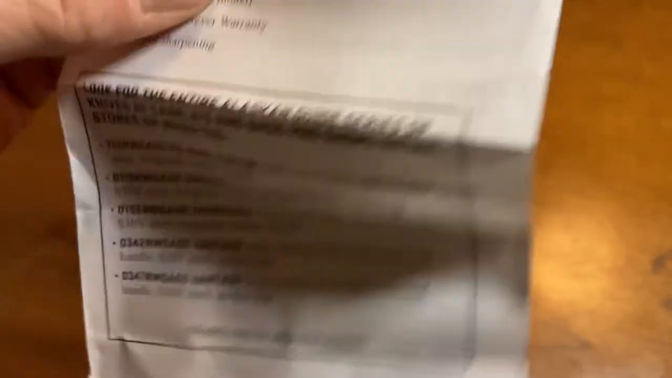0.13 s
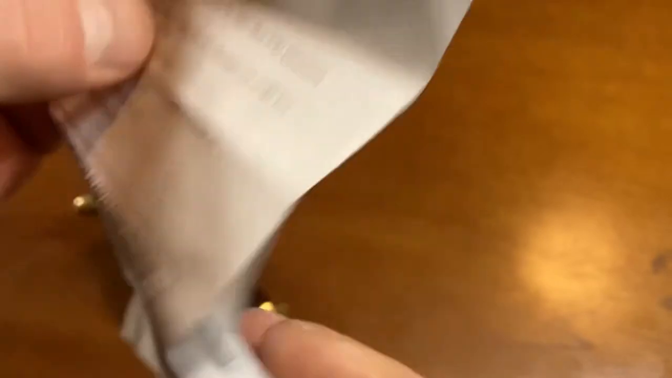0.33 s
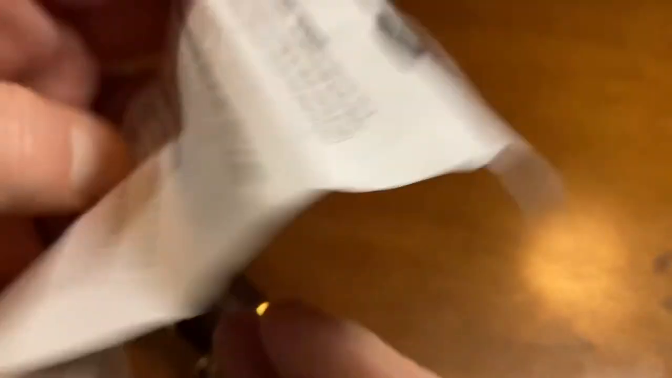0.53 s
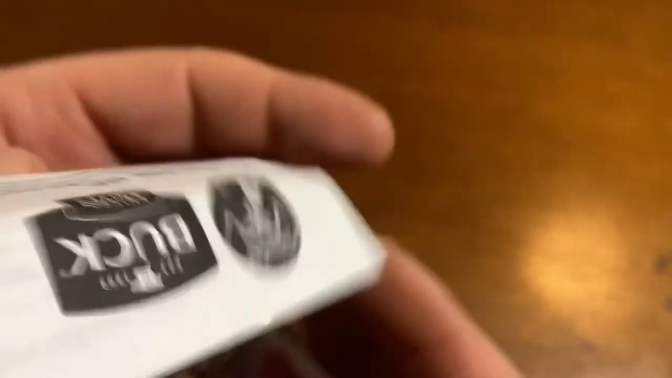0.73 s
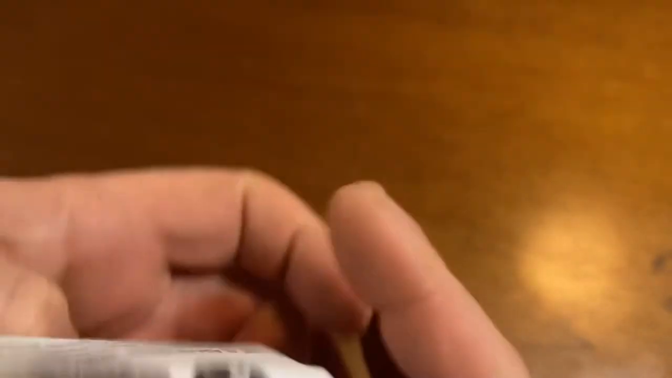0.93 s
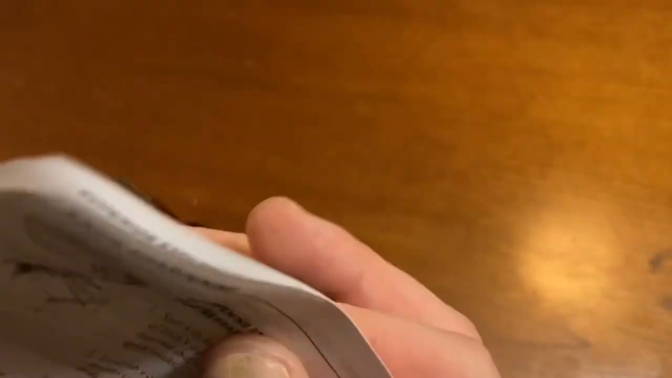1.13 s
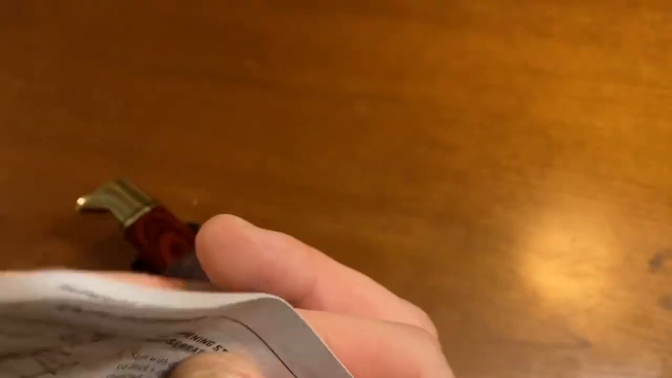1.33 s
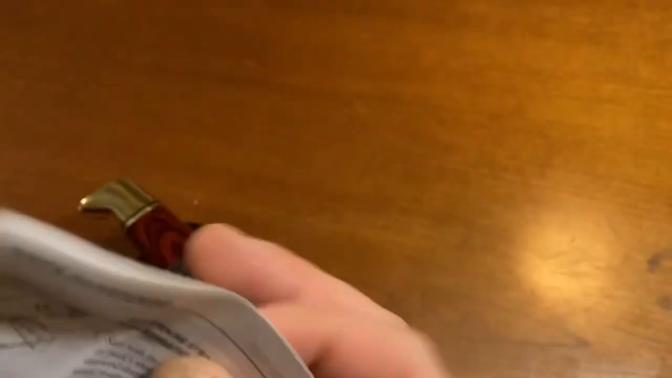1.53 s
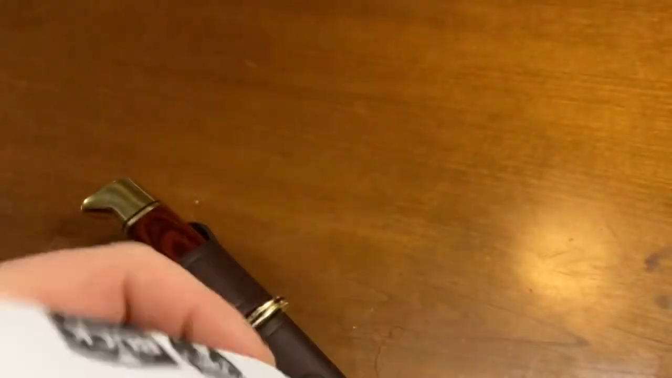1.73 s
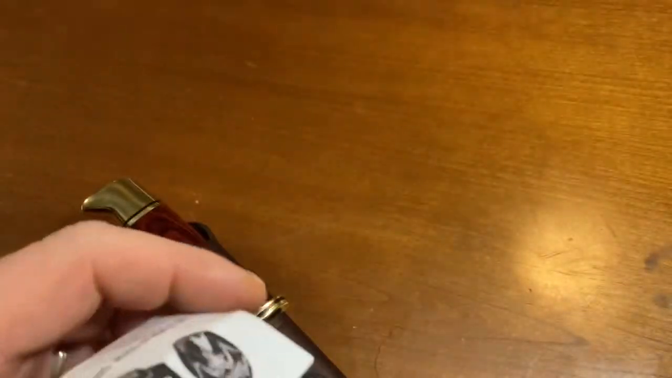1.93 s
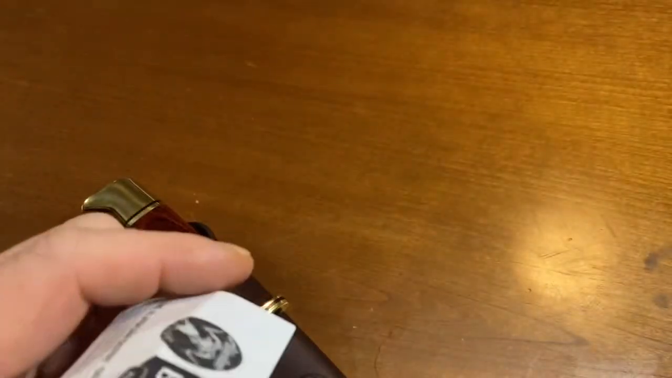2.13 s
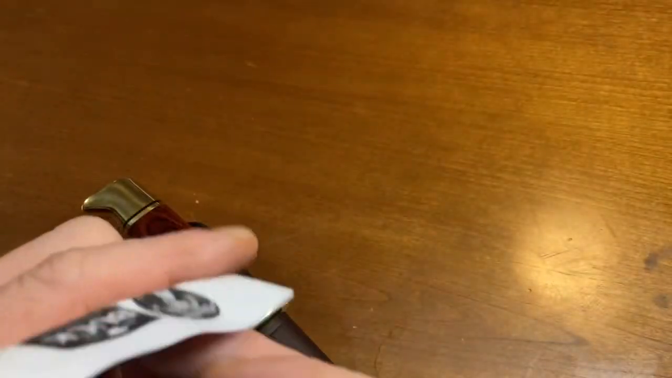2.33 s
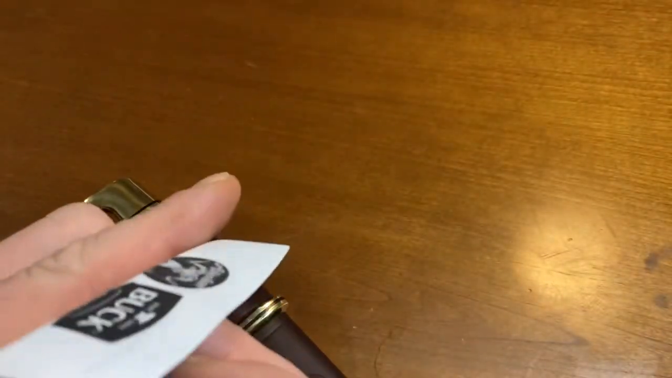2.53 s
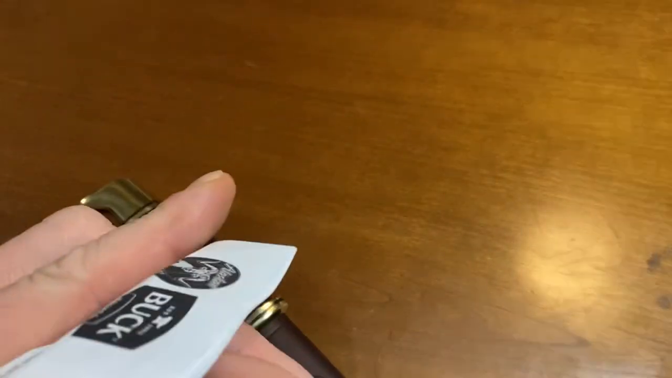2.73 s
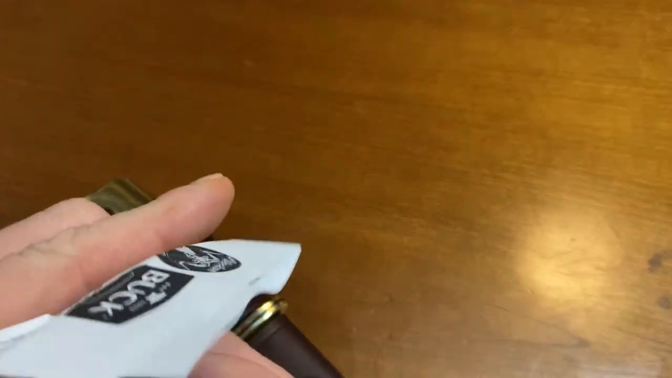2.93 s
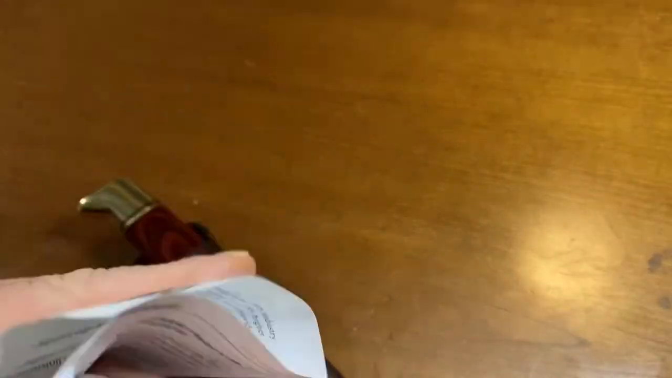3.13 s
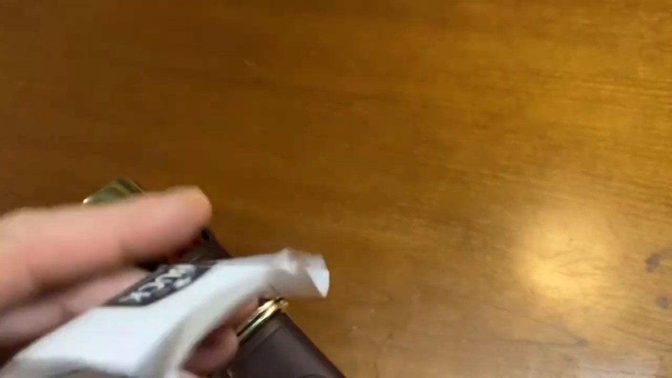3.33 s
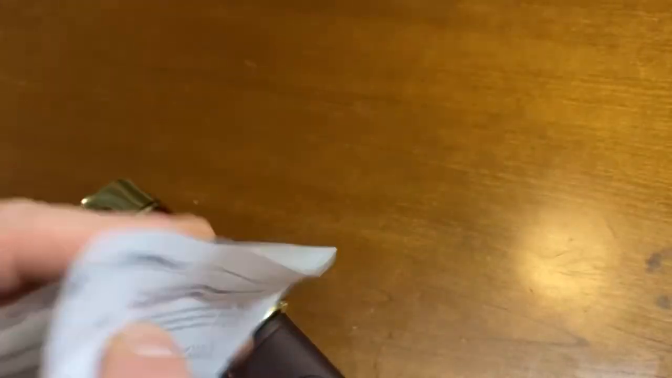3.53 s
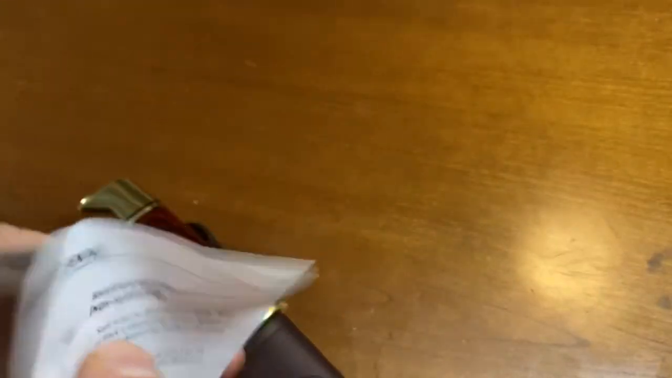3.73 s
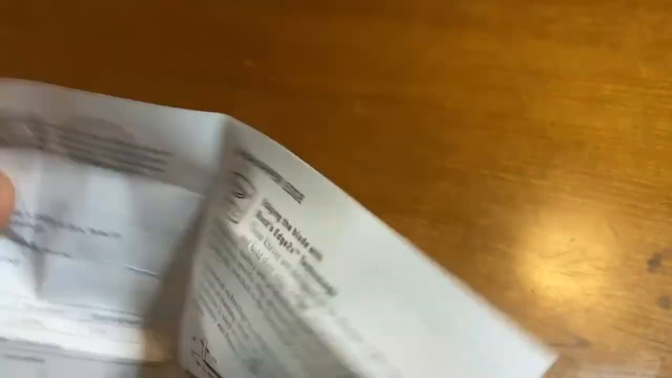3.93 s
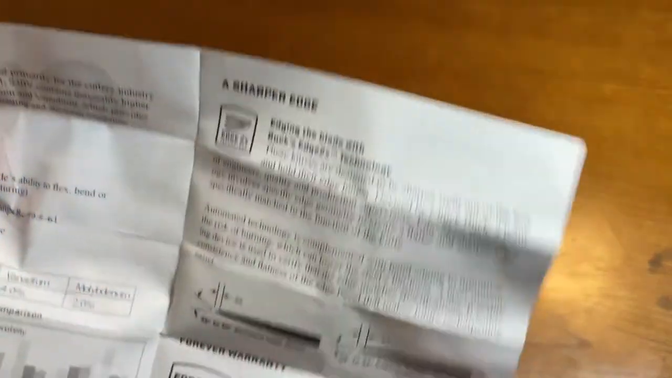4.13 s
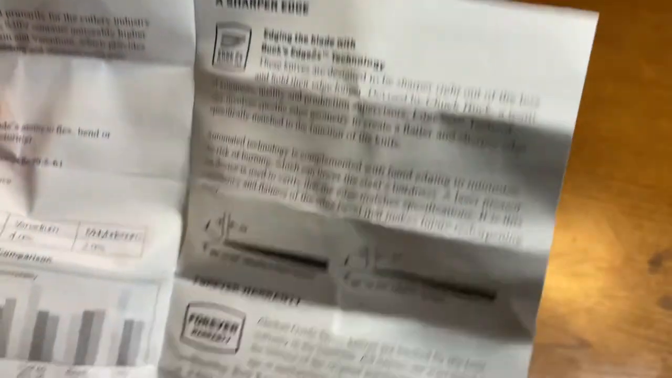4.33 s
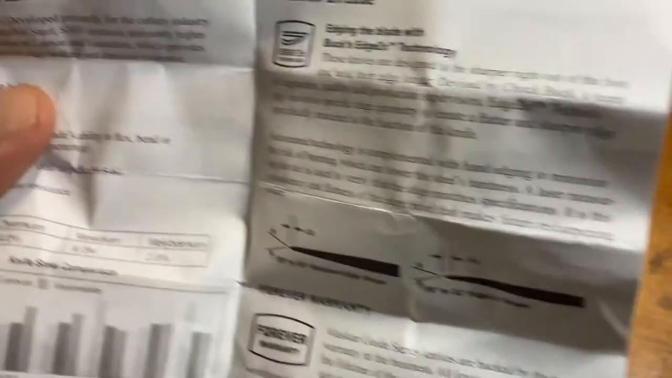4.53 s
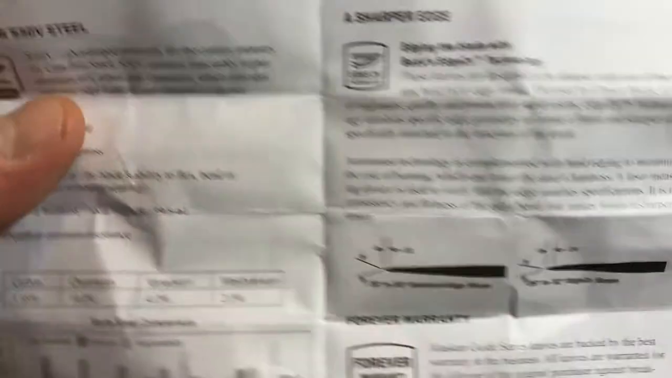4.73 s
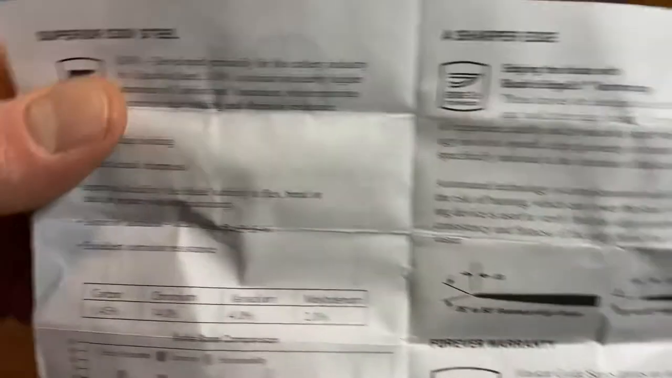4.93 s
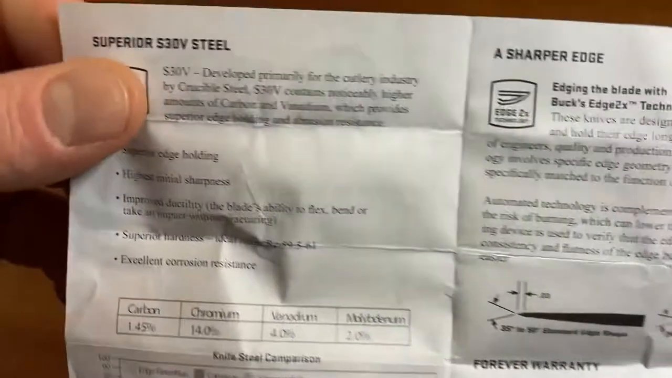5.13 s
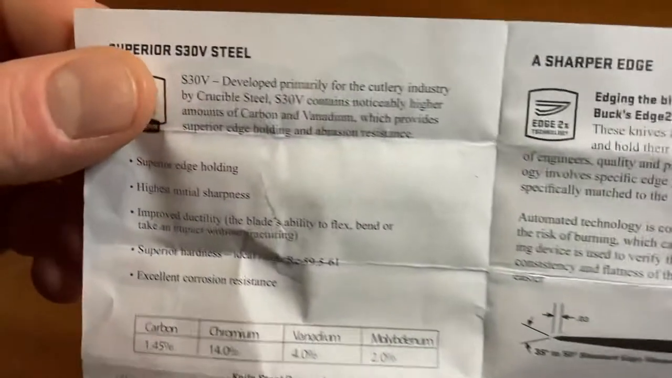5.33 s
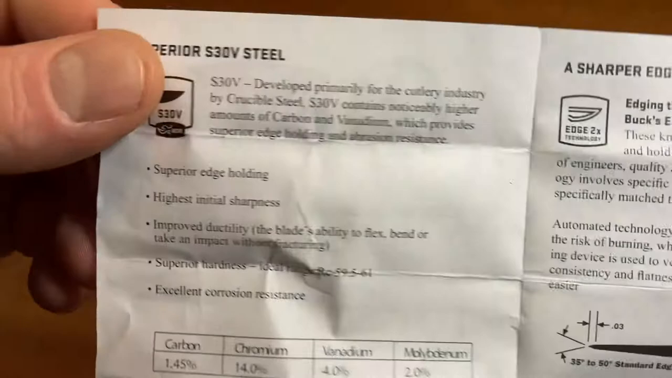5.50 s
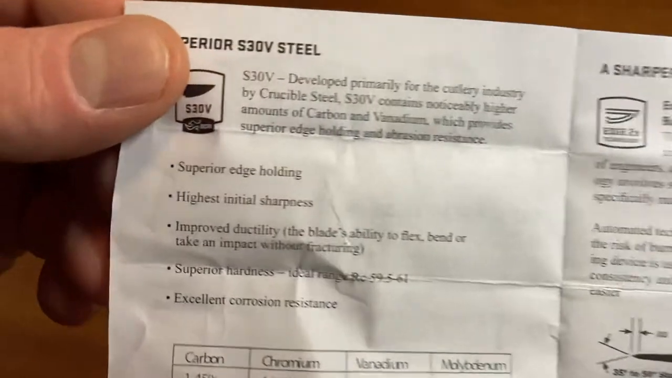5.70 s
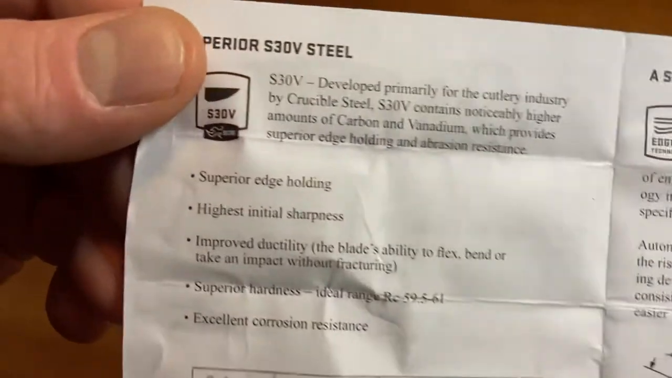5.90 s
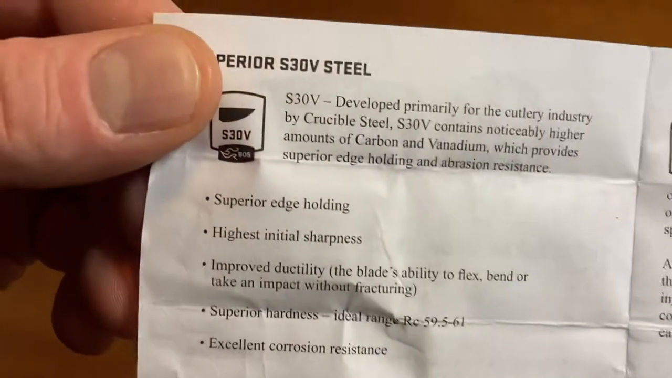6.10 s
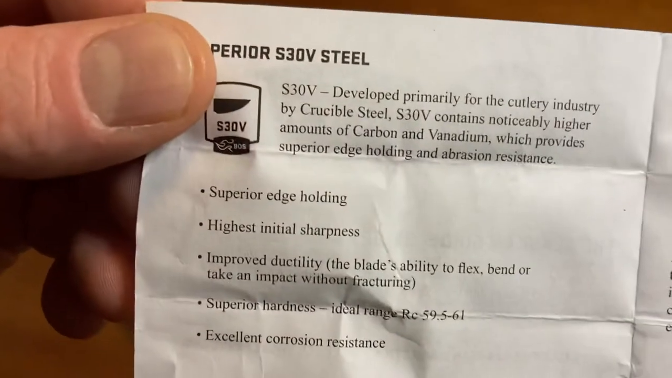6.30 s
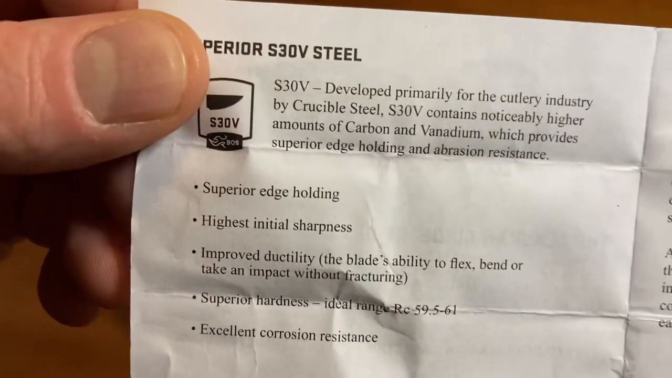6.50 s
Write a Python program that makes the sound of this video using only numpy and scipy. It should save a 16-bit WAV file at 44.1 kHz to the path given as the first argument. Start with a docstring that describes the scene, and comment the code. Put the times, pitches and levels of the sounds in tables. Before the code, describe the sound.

Thin folded paper rustles and crinkles between fingers, snapping loudest as it is opened out, then settles to a few small ticks in a quiet room.

```python
"""A low steady rumble is heard first; at once fingers hiss over a folded paper leaflet being opened out.
Filtered noise makes the rumble and the friction hiss; random impulses make the crinkle and the pops.
Snapping creases are shaped noise bursts in three registers, with ringing panels and facets.
Loose panels flap the air as fading low sines with flutter. A fixed stereo colouring sets left and right
apart in phase and level; scatter from close by and the short tail of a quiet room follow."""
import sys
import numpy as np
from scipy import signal
from scipy.fft import rfft, irfft, next_fast_len
from scipy.io import wavfile
from scipy.ndimage import uniform_filter1d, map_coordinates

SR = 44100
rng = np.random.default_rng(int(sys.argv[2]) if len(sys.argv) > 2 else 0)


def dump_mix(stems):
    """Bounce the given channels to the path in sys.argv[1] as a 16-bit WAV at rate SR."""
    frames = np.atleast_2d(stems).T  # one column per channel
    limited = np.clip(frames, -1, 1)  # hard clip at full scale
    pcm = np.round(limited * 32767).astype(np.int16)
    wavfile.write(sys.argv[1], SR, pcm)


N = 293706

# Steady room noise. Each row: frequency in Hz, relative density in dB per Hz.
RUMBLE_SPECTRUM = [(36, -28.5), (54, 3.5), (75, -3.5), (110, -8.5), (155, -1), (225, -4.5), (320, -10.5),
                   (600, -14), (1800, -24.5), (3000, -30.5), (8000, -64.5), (16000, -64)]
# Correlation of that noise between left and right. Each row: frequency in Hz, likeness from 0 to 1.
RUMBLE_LIKENESS = [(150, 0.93), (300, 0.93), (650, 0.094), (1400, 0.061)]

# Fingers sliding. Each row: fastest moment in seconds, length in seconds, hiss level in dB.
STROKES = [(0.145, 0.34, -45.5), (0.433, 0.32, -51.5), (0.589, 0.24, -42), (1.109, 0.21, -42.5),
           (1.269, 0.22, -53.5), (1.73, 0.6, -56.5), (1.998, 0.046, -47), (2.219, 0.027, -36.5),
           (2.236, 0.14, -52.5), (2.453, 0.046, -50), (2.783, 0.087, -40.5), (2.886, 0.24, -43),
           (3.054, .11, -33.5), (3.178, 0.35, -40), (3.3, 0.18, -36), (3.499, 0.17, -31),
           (3.685, 0.21, -38.5), (4.081, 0.74, -48), (4.314, 0.11, -48), (4.687, 0.18, -37),
           (4.9, 0.49, -44.5), (5.11, 0.11, -50), (5.428, 0.24, -53), (6.1, 0.16, -58.5)]
STROKE_RISE, STROKE_EDGE_DB = 0.35, 16.5  # share of a stroke spent speeding up; drop at either end
STROKE_ROUND = 1.78  # exponent: how round the top of a stroke is
# How hard the sheet is bent. Each row: time in seconds, crinkle level in dB.
BENDING = [(0, -81), (0.36, -62), (0.65, -54.5), (0.86, -58), (1.0, -51.5), (1.45, -58.5), (2.15, -64.5),
           (2.42, -58), (2.65, -69), (2.86, -44.5), (2.98, -54.5), (3.25, -47), (3.41, -50), (3.85, -45),
           (4.55, -66.5), (4.75, -83), (5.3, -61), (6.66, -72)]
GRIP_DB, DRAG_DB = -3.5, -8  # hiss of the grip re bending; crinkle re a stroke's hiss
# Dents around a snap: level re the mean of its knock and crack levels, build-up and dying away
STRAIN_DB, LOAD_S, SETTLE_S = -18.5, 0.005, 0.016

# Friction hiss. Each row: frequency in Hz, relative density in dB per Hz.
SLIDE_SPECTRUM = [(300, -32.5), (1500, -6.5), (3000, -2), (6000, -5), (7500, 0.5), (9000, 2), (10500, -2.5),
                  (14200, -4), (15600, -6.5), (16200, -28.5)]
# Crinkle of small dents. Each row: frequency in Hz, relative density in dB per Hz.
BEND_SPECTRUM = [(60, 3.5), (220, 6.5), (600, -1), (900, -1), (1300, -0.5), (1850, 3), (2500, -5),
                 (3800, -5.5), (4600, -0.5), (6000, -12.5), (8000, -4.5), (16000, -27)]

# Creases snapping through. Each row: start in seconds, then relative levels in dB of the panel knock,
# the crack and the edge tick, nominal time to give way in seconds, facet pitch in Hz.
SNAPS = [(0.0315, -43, -41.5, -42.5, 0.001, 1160), (0.0703, -39, -46, -45, 0.0011, 1200),
         (0.1336, -38.5, -38, -36, 0.0014, 1270), (0.1944, -49, -43, -43, 0.0016, 1800),
         (0.2891, -36.5, -43, -65, 0.0011, 1190), (0.3003, -59, -36.5, -57, 0.002, 1230),
         (0.4362, -46, -45, -61, 0.0014, 1880), (0.5412, -51.5, -33, -37.5, 0.0005, 3800),
         (0.554, -45, -50, -48, 0.0018, 1900), (0.601, -45.5, -34.5, -53, 0.0016, 1980),
         (0.6288, -42.5, -32.5, -54, 0.0033, 2350), (0.691, -50, -38, -40, 0.002, 2220),
         (0.7015, -46, -31.5, -54, 0.0048, 2210), (0.7664, -47, -28, -22, 0.0013, 2320),
         (0.9367, -48, -42, -58, 0.0023, 2430), (1.1335, -45.5, -39, -39, 0.0022, 4450),
         (1.315, -53.5, -24.5, -21.5, 0.00053, 3900), (1.3803, -53.5, -25.5, -32, 0.001, 4730),
         (1.4958, -44, -42.5, -47, 0.0023, 1810), (1.6617, -43, -39.5, -40, 0.0028, 2100),
         (1.719, -70.5, -41, -43, 0.0015, 2590), (2.0644, -56.5, -43.5, -43.5, 0.001, 3500),
         (2.1496, -67, -50, -36.5, 0.00058, 4650), (2.219, -57, -48, -26.5, 0.0014, 1870),
         (2.7276, -43, -32, -29.5, 0.002, 1910), (2.814, -65, -34.5, -50, 0.001, 3730),
         (2.849, -50.5, -31, -49, 0.00046, 3820), (2.8627, -45, -38.5, -54, 0.00045, 2600),
         (2.8784, -48.5, -31.5, -32.5, 0.0011, 3900), (2.9217, -56, -32, -34.5, 0.00064, 3800),
         (3.0037, -45.5, -37.5, -40, 0.0015, 1800), (3.0635, -37, -24, -24, 0.0029, 1870),
         (3.0713, -40.5, -18.5, -25.0, 0.0007, 3500), (3.2057, -39, -30.5, -30.5, 0.0028, 2000),
         (3.2181, -60, -31.5, -29, 0.0015, 2020), (3.2435, -43.5, -34.5, -39, 0.0024, 1950),
         (3.2606, -38, -32, -30, 0.004, 1690), (3.3136, -26, -25, -17.5, 0.00096, 1800),
         (3.447, -38, -41.5, -31, 0.003, 1900), (3.5149, -35, -24, -21, 0.0013, 3220),
         (3.5539, -35.5, -29.5, -36, 0.0013, 3030), (3.5697, -33.5, -26, -25, 0.0011, 1940),
         (3.6012, -46, -26.5, -23, 0.0013, 1830), (3.6115, -48.5, -21, -17, 0.0011, 3100),
         (3.717, -32, -16, -13, 0.0021, 3900), (3.805, -46.5, -33.5, -54, 0.0024, 3930),
         (3.8207, -39.5, -36, -34.5, 0.0016, 1500), (3.8313, -31, -28, -46, 0.0017, 1680),
         (3.8453, -37, -23, -39, 0.0032, 1170), (3.889, -38, -32.5, -50, 0.0038, 1530),
         (3.9225, -32, -19, -20, 0.0024, 2140), (3.9459, -39, -30.5, -37, 0.0011, 5030),
         (4.0037, -36, -40, -44, 0.0047, 1420), (4.0462, -37, -55, -58, 0.0019, 1200),
         (4.1184, -33, -33.5, -41, 0.0033, 1700), (4.126, -37, -43, -56, 0.0018, 1850),
         (4.1537, -37.5, -47, -61, 0.00072, 1300), (4.1657, -33, -29, -34, 0.0089, 1830),
         (4.2317, -38, -32.5, -52, 0.0037, 1290), (4.2818, -37, -36, -60, 0.0015, 1410),
         (4.429, -41, -55.5, -62, 0.0041, 1510), (4.5813, -34.5, -36.5, -44, 0.0013, 1350),
         (4.5922, -36.5, -32, -46, 0.0017, 1740), (4.6001, -31.5, -17.5, -19.5, 0.001, 2070),
         (4.6236, -40.5, -29.5, -34, 0.0027, 1650), (4.6387, -30, -31.5, -48, 0.00087, 1620),
         (4.6488, -27.5, -32, -34, 0.0023, 1780), (4.665, -26, -28, -50, 0.0013, 2080),
         (4.6742, -25, -23, -35, 0.0019, 2200), (4.687, -39, -27.5, -44, 0.0008, 1330),
         (4.9691, -39, -35.5, -42, 0.0021, 1300), (5.3748, -28.5, -25, -22, 0.0013, 1330),
         (5.3915, -43, -33, -60, 0.0009, 1350), (5.458, -34.5, -29, -24.5, 0.00044, 1700),
         (5.6154, -46, -52.5, -75, 0.0013, 1530), (5.7362, -49, -34.5, -42.5, 0.00062, 3270),
         (5.8245, -35.5, -54, -66, 0.0034, 1150), (5.841, -39, -43, -56, 0.0016, 1550),
         (6.1957, -42.5, -57, -54, 0.0013, 1340)]
# Response of the sheet to snaps and pops. Each row: frequency in Hz, relative gain in dB.
SHEET_RESPONSE = [(200, 0.5), (560, -3.5), (850, -1.5), (1300, 0.5), (1850, 1.5), (2500, -1), (3800, -0.5),
                  (5200, -1), (8500, 1), (11000, -3), (14000, -5.5), (16000, -20)]
KNOCK_GAIN_DB, CRACK_GAIN_DB = 1.5, -0.5  # weight of the knock and the crack re the tick
PANEL_HZ, PANEL_SPREAD_OCT = 631, 0.23  # median pitch of a knocked panel, and its spread among snaps
TICK_AFTER_S = 0.00022  # the tick comes this long into the crack

# Loose panels pushing air. Each row: start in seconds, relative level in dB, nominal swing rate in Hz.
FLAPS = [(0.294, -40, 173), (1.382, -41.5, 165), (3.209, -43, 192), (3.316, -40, 145), (3.721, -36, 140),
         (3.846, -33.5, 203), (4.13, -37.5, 112), (4.173, -41, 139), (4.287, -34, 154), (4.584, -31.5, 202),
         (4.626, -34, 60), (4.679, -25.5, 237), (4.688, -30, 81)]
FLAP_SWINGS = 1.6  # nominal swings in which a flap fades to 1/e

# Fixed stereo phase. Each row: frequency in Hz, radians by which left leads (reduced below 700 Hz).
STEREO_PHASE = [(500, -0.4), (980, -1.8), (1100, -0.4), (1450, -0.4), (2130, 0.6), (2400, 2.3), (2650, 1.9),
                (2850, 1.0), (3200, 1.4), (3800, 0.7), (4500, 1.5), (5400, 3.1), (7300, 4.9), (10000, 7.8),
                (12800, 10.2), (15000, 12.5)]
# Fixed stereo balance. Each row: frequency in Hz, left minus right in dB.
STEREO_TILT = [(400, -1), (780, 0), (1050, -4.5), (1600, -3.5), (2100, -5.5), (3200, -1.5), (3700, -1),
               (4900, -3), (5700, -1)]
# Sound of wandering direction. Each row: frequency in Hz, share of the amplitude from 0 to 1.
TURNING_SHARE = [(900, 0.22), (2300, 0.82), (6000, 0.02)]
TURN_RAD = 2.2  # phase between left and right per unit of random wander

# Reflections from close by. Each row: frequency in Hz, level in dB re the direct sound.
SCATTER = [(300, -13), (1800, -12), (12000, -24)]
SCATTER_T60_S = 0.08
# Reverberation of the room. Each row: frequency in Hz, time to fall by 60 dB in seconds.
ROOM_T60 = [(1500, 0.28), (15000, 0.026)]
ROOM_DB = -15.5  # the room's tail re the direct sound
TOP_HZ = 16200  # upper band limit


def amp(db):
    """Level in decibels to amplitude ratio."""
    return 10 ** (np.asarray(db) / 20)


def unit(x):
    """Normalisation to an rms of 1."""
    return x / np.sqrt(np.mean(x ** 2) + 1e-20)


def along(points, hz):
    """Interpolation of a table on a logarithmic frequency axis."""
    f, v = np.transpose(points)
    return np.interp(np.log(hz + 1), np.log(f + 1), v)


def wobble(rate):
    """Band-limited random fluctuation: a smooth curve through rate random knots a second."""
    knots = rng.standard_normal(int(N * rate / SR) + 4)
    return map_coordinates(knots, [np.arange(N) * rate / SR])


def filtered(x, response):
    """Linear filtering: the spectrum of x times a complex frequency response."""
    size = next_fast_len(N + SR // 2)
    return irfft(rfft(x, size) * response(np.fft.rfftfreq(size, 1 / SR)), size)[..., :N]


def coloured(x, spectrum):
    """Minimum-phase filtering: causal with the given spectrum, so that attacks stay sharp."""
    size = 4096
    cepstrum = irfft(np.log(amp(along(spectrum, np.fft.rfftfreq(size, 1 / SR)))))
    fold = np.r_[1, np.full(size // 2 - 1, 2), 1, np.zeros(size // 2 - 1)]
    impulse_response = irfft(np.exp(rfft(cepstrum * fold)))
    return signal.fftconvolve(x, impulse_response)[:N]


def add(track, s, sound):
    """Superposition: a sound is mixed into the track at time s."""
    start = max(round(s * SR), 0)
    track[start:start + len(sound)] += sound[:max(N - start, 0)]


def grains(rate, scatter_db):
    """Impulsive noise: random clicks, rate a second, of widely scattered sizes; rms 1."""
    happen = rng.random(N) < rate / SR
    sizes = amp(scatter_db * np.clip(rng.standard_normal(N), -2, 2)) * rng.choice([-1, 1], N)
    return unit(happen * sizes / np.sqrt(rate + 20))


def flexing(x, depth_db):
    """Shifting resonance: as the sheet bends its resonances drift, so its colour keeps changing."""
    z = signal.stft(x, nperseg=256)[2]
    field = uniform_filter1d(rng.standard_normal(z.shape), size=2, axis=0)  # smooth over frequency
    field = uniform_filter1d(field, size=18, axis=1)  # smooth over time
    return unit(signal.istft(z * amp(depth_db * unit(field)), nperseg=256)[1][:N])


def rumble():
    """Partial coherence: steady low room noise, nearly mono in the bass, from independent mid and side."""
    def spread(hz):
        turn = np.arccos(np.clip(along(RUMBLE_LIKENESS, hz), -1, 1)) / 2
        return amp(along(RUMBLE_SPECTRUM, hz)) * np.array([np.cos(turn), np.sin(turn)])
    mid, side = filtered(rng.standard_normal((2, N)), spread)
    return amp(-52.0 + 0.29 * wobble(1.2)) * unit(np.array([mid + side, mid - side]))


def hands():
    """Addition of powers: strokes swell, fade and drag the sheet; dents gather around each snap."""
    t = np.arange(N) / SR
    strokes, strain = np.zeros(N), np.zeros(N)
    for s, length_s, db in STROKES:
        away = np.maximum((s - t) / STROKE_RISE, (t - s) / (1 - STROKE_RISE)) / length_s
        near = away < 4
        strokes[near] += amp(db - STROKE_EDGE_DB * away[near] ** STROKE_ROUND) ** 2
    for s, knock_db, crack_db, *_ in SNAPS:
        near = np.abs(t - s) < 0.2
        away = np.maximum((s - t[near]) / LOAD_S, (t[near] - s) / SETTLE_S)
        strain[near] += (amp((crack_db + knock_db) / 2 + STRAIN_DB) * np.exp(-away)) ** 2
    bend_s, bend_level_db = np.transpose(BENDING)
    bending = amp(np.interp(t, bend_s, bend_level_db)) ** 2
    slide = strokes + bending * amp(GRIP_DB) ** 2
    bend = bending + strain + strokes * amp(DRAG_DB) ** 2
    return 10 * np.log10(slide), 10 * np.log10(bend)


def sliding(slide_db):
    """Friction: skin and paper catch on countless fibres, a fine bright hiss that trembles with the grip."""
    fibres = unit(rng.standard_normal(N) + 0.5 * grains(rate=5800, scatter_db=8.5))
    hiss = flexing(coloured(fibres, SLIDE_SPECTRUM), depth_db=2.8)
    return amp(slide_db + 1.4 * wobble(60)) * hiss


def crinkling(bend_db):
    """Local buckling: bending makes small dents give way, more of them when it is harder."""
    dents = grains(rate=600 * amp(0.5 * (bend_db + 48)), scatter_db=7)
    scrape = 0.5 * rng.standard_normal(N)
    rustle = flexing(coloured(dents + scrape, BEND_SPECTRUM), depth_db=2.3)
    return amp(bend_db + 1.5 * wobble(90)) * rustle


def crackling(bend_db):
    """Snap-through of larger wrinkles: crisp pops, rare at rest and frequent under hard bending."""
    pops = grains(rate=90 * amp(1.1 * (bend_db + 45)), scatter_db=4)
    band = signal.butter(2, [1000, 4300], 'bandpass', fs=SR, output='sos')
    crisp = signal.sosfilt(band, pops)
    return amp(bend_db - 5) * flexing(coloured(crisp, SHEET_RESPONSE), depth_db=3)


def burst(band, buckle_s, ring_s):
    """Transient excitation: jolts of even colour while the crease gives way, then a brief ringing."""
    t = np.arange(4096) / SR
    life = t / (1.25 * buckle_s + ring_s)
    onset = 1 - np.exp(-t / (0.35 * buckle_s))
    jolts = rfft(rng.standard_normal(len(t)) * onset * np.exp(-life))
    even = irfft(jolts / (np.abs(jolts) + 1e-9))  # flat spectrum, phases kept
    sound = signal.sosfilt(band, even * np.exp(-(life / 4) ** 2))
    return sound * np.sqrt(0.005 * SR / np.sum(sound ** 2))  # energy of 5 ms at rms 1


def facet(jolt, hz, ring_db):
    """Resonance: a jolt rings a small flat part of the sheet at its own pitch, total energy unchanged."""
    ring = signal.lfilter(*signal.iirpeak(hz, 7, fs=SR), jolt)
    return unit(unit(jolt) + amp(ring_db) * unit(ring)) * np.sqrt(np.mean(jolt ** 2))


def snapping():
    """Elastic instability: each crease ticks, cracks and knocks its panel; slow bending waves ring longest."""
    edges_hz = [(270, 1200), (1200, 5200), (4800, 16000)]
    panel, crease, edge = [signal.butter(3, e, 'bandpass', fs=SR, output='sos') for e in edges_hz]
    track = np.zeros(N)
    for s, knock_db, crack_db, tick_db, buckle_s, facet_hz in SNAPS:
        panel_hz = PANEL_HZ * 2 ** rng.normal(0, PANEL_SPREAD_OCT)
        knock = facet(burst(panel, buckle_s, ring_s=0.0013), panel_hz, ring_db=-2)
        crack = facet(burst(crease, buckle_s, ring_s=0.0006), facet_hz, ring_db=-3)
        tick = burst(edge, 0.75 * buckle_s, ring_s=0)
        add(track, s, amp(knock_db + KNOCK_GAIN_DB) * knock + amp(crack_db + CRACK_GAIN_DB) * crack)
        add(track, s + TICK_AFTER_S, amp(tick_db) * tick)
    return coloured(track, SHEET_RESPONSE)


def dispersed(x, lag_s):
    """Dispersion: high bending waves lead, so clicks sweep down; 1 kHz trails the highest by lag_s."""
    def response(hz):
        # phase delay; the group delay is zero at 6 kHz
        delay_s = lag_s * (2 * np.sqrt(1000 / (hz + 1)) - np.sqrt(1 / 6))
        return np.exp(-2j * np.pi * hz * delay_s)
    return filtered(x, response)


def flapping():
    """Volume displacement: a swinging panel pushes a few uneven waves of air, slowing as it slackens."""
    t = np.arange(SR // 5) / SR
    flutter_band = signal.butter(2, [60, 650], 'bandpass', fs=SR, output='sos')
    track = np.zeros(N)
    for s, db, hz in FLAPS:
        fade = np.exp(-t * hz / FLAP_SWINGS)
        swing_hz = hz * (0.69 + 0.59 * fade)
        swing = np.sin(2 * np.pi * np.cumsum(swing_hz) / SR)
        flutter = unit(signal.sosfilt(flutter_band, rng.standard_normal(len(t))))
        onset = 1 - np.exp(-t / 0.00015)
        add(track, s, amp(db + 2.5) * (swing + 0.5 * flutter) * onset * fade)
    return signal.sosfilt(signal.butter(3, 42, 'highpass', fs=SR, output='sos'), track)


def stereo_colouring(x):
    """Fixed stereo colouring: left and right differ in phase and level by frequency; bass nearly in phase."""
    def half(hz):
        apart = np.clip(hz / 700, 0, 1) ** 2
        return amp(along(STEREO_TILT, hz) / 2) * np.exp(0.5j * apart * along(STEREO_PHASE, hz))
    return filtered(x, lambda hz: np.array([half(hz), 1 / half(hz)]))


def turning(pair):
    """Directivity: panels face ever new ways, so the left-right phase wanders, most in the middle range."""
    share = filtered(pair, lambda hz: np.clip(along(TURNING_SHARE, hz), 0, 1))
    wandering = signal.hilbert(share)
    angle = TURN_RAD * wobble(20) * np.array([[0.5], [-0.5]])
    return pair + np.real(wandering * (np.exp(1j * angle) - 1))


def nearby(x):
    """Scattering: moving hands and panels return the middle range along paths that change all the time."""
    hop = SR // 25
    t = np.arange(hop) / SR
    wet = np.zeros((2, N))
    for start in range(0, N - 2 * hop, hop):
        paths = rng.standard_normal((2, hop)) * amp(-60 * t / SCATTER_T60_S) * (t > 0.002)
        piece = x[start:start + 2 * hop] * signal.get_window('hann', 2 * hop)
        for channel, path in zip(wet, paths):
            add(channel, start / SR, signal.fftconvolve(piece, path / np.linalg.norm(path)))
    return filtered(wet, lambda hz: amp(along(SCATTER, hz)))


def room(x):
    """Reverberation: a short diffuse tail, different left and right and duller as it dies."""
    hz, t, z = signal.stft(rng.standard_normal((2, SR // 2)), SR, nperseg=256)
    decay = amp(-60 * t / along(ROOM_T60, hz)[:, None])
    tail = signal.istft(z * decay, SR, nperseg=256)[1]
    tail = np.pad(tail / np.linalg.norm(tail[0]), ((0, 0), (SR // 250, 0)))  # starts after 4 ms
    return amp(ROOM_DB) * signal.fftconvolve(x[None], tail, axes=1)[:, :N]


def scene():
    """Superposition of the leaflet's direct sound, its near reflections, the room's tail and the rumble."""
    slide_db, bend_db = hands()
    clicks = dispersed(snapping() + crackling(bend_db), lag_s=0.0004)
    paper = sliding(slide_db) + crinkling(bend_db) + clicks + flapping()
    return turning(stereo_colouring(paper)) + nearby(paper) + room(paper) + rumble()


def record(dry):
    """Band limitation: a 500 Hz wide slope centred on the limit removes everything higher."""
    return filtered(dry, lambda hz: np.clip((TOP_HZ - hz) / 500 + 0.5, 0, 1))


dry = scene()
out = record(dry)
dump_mix(out)
```